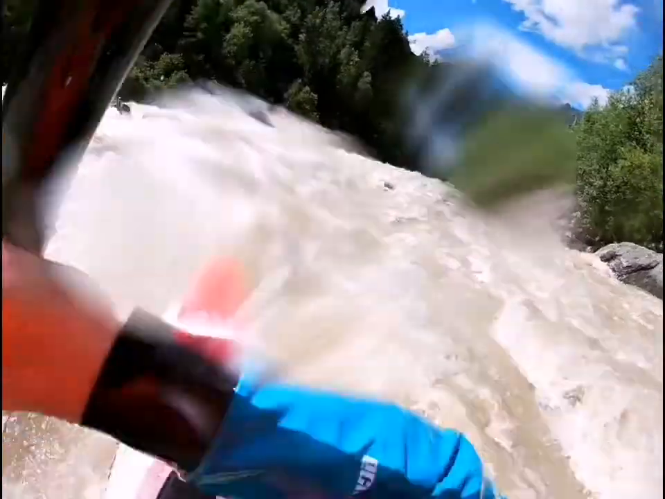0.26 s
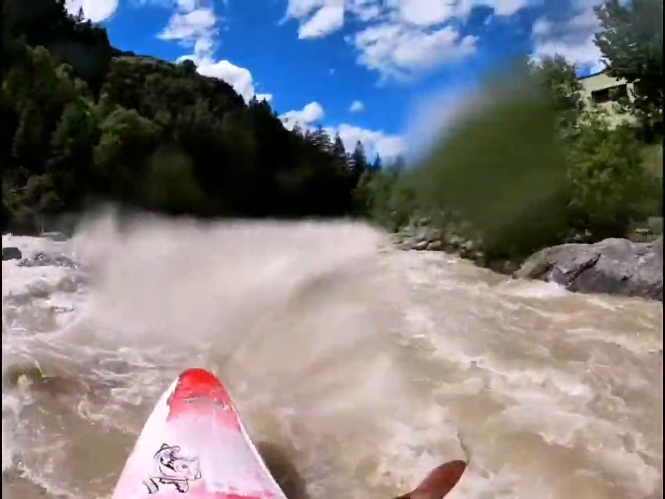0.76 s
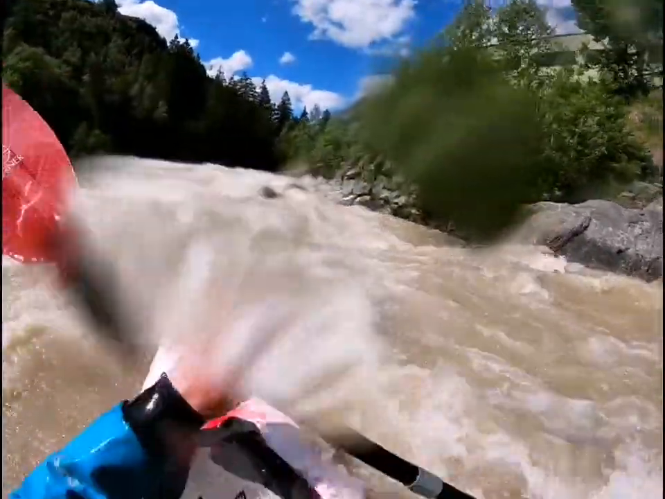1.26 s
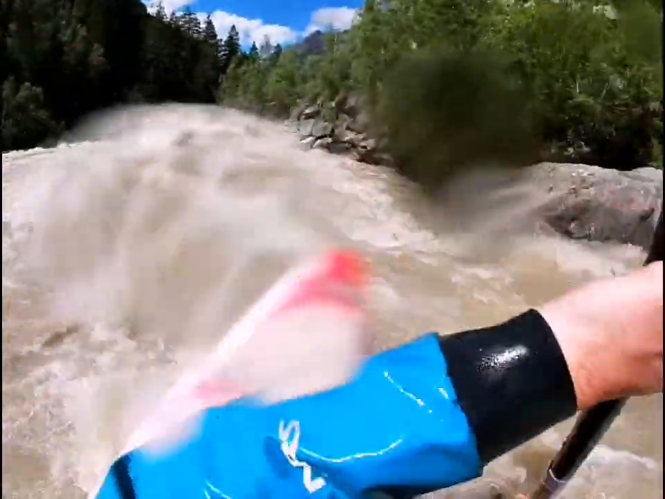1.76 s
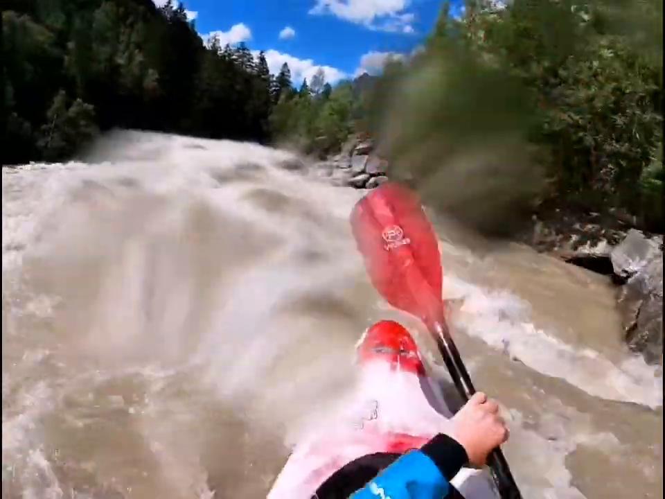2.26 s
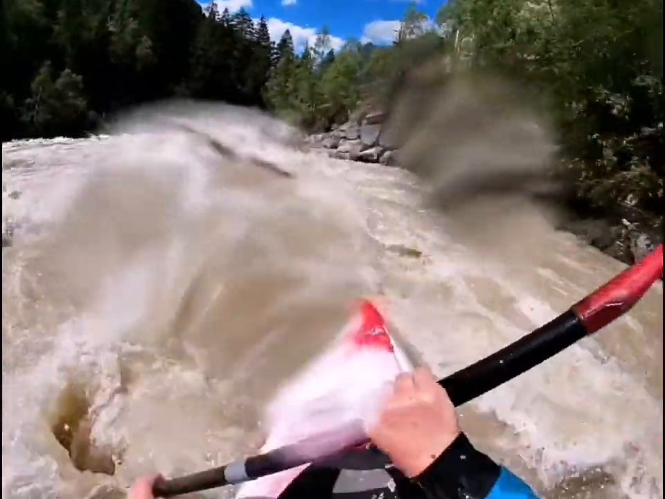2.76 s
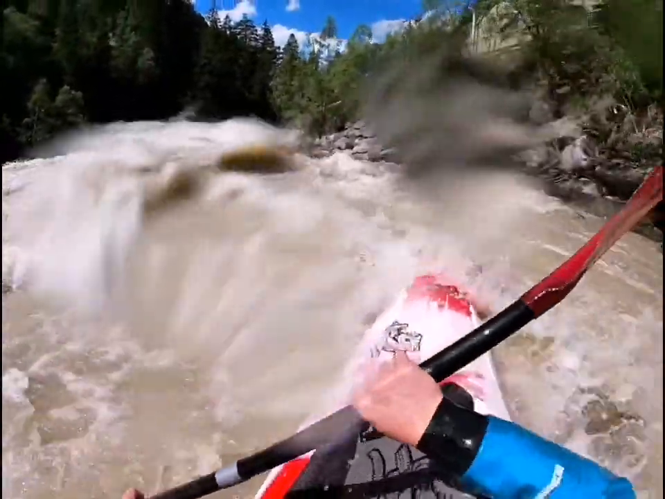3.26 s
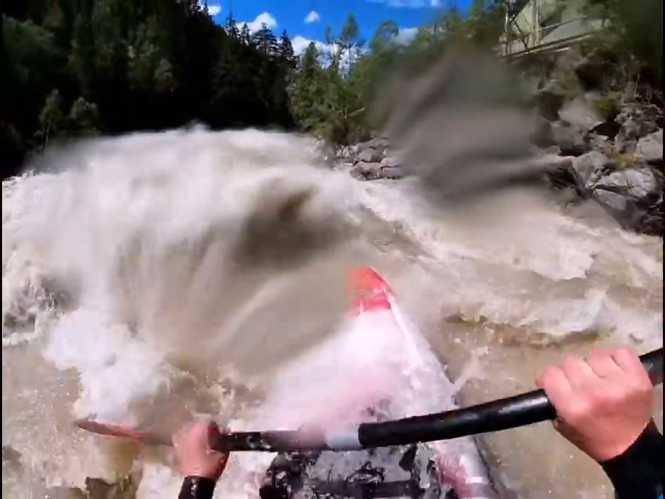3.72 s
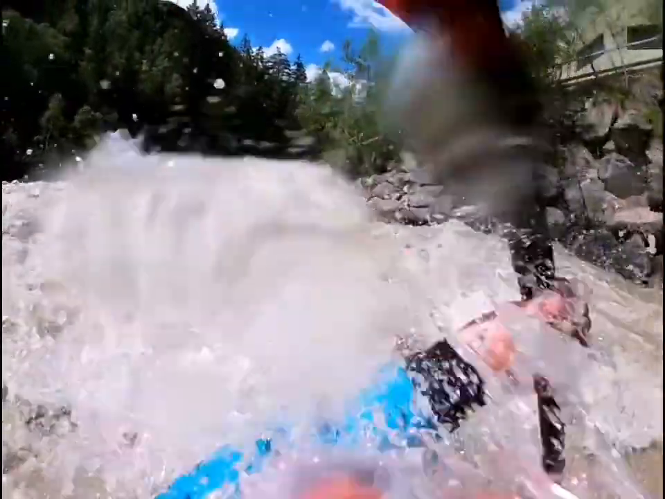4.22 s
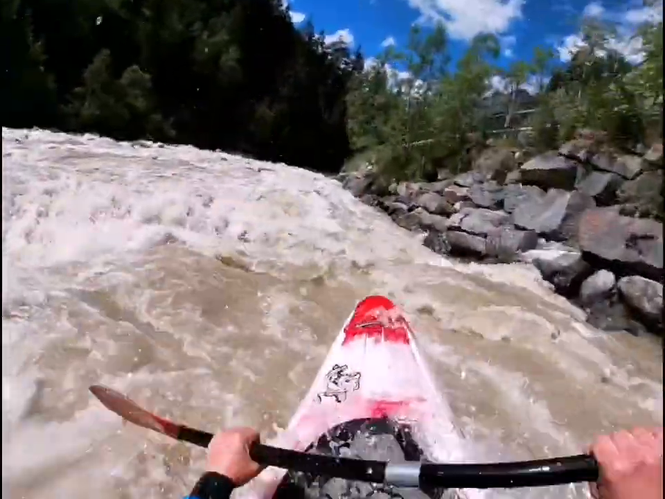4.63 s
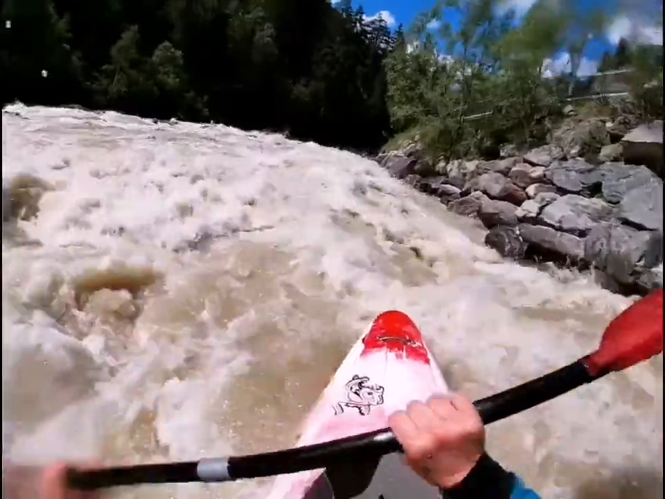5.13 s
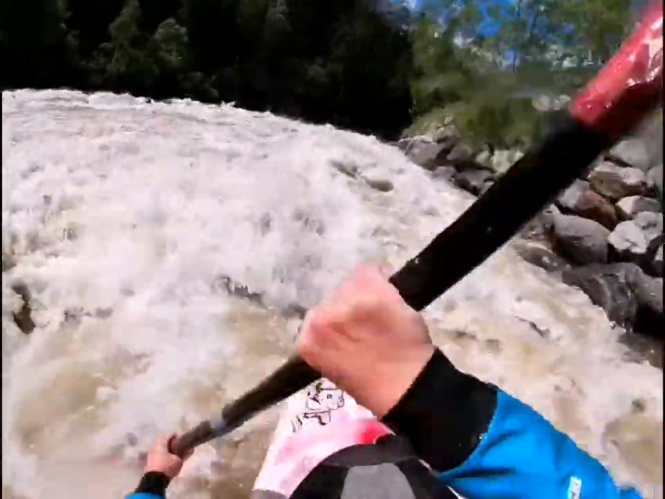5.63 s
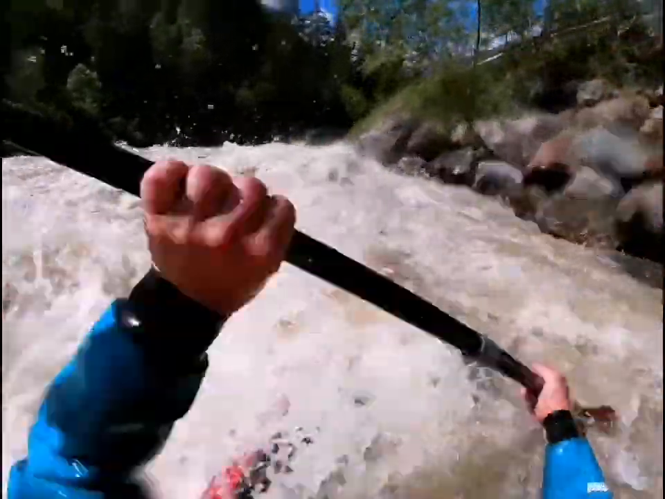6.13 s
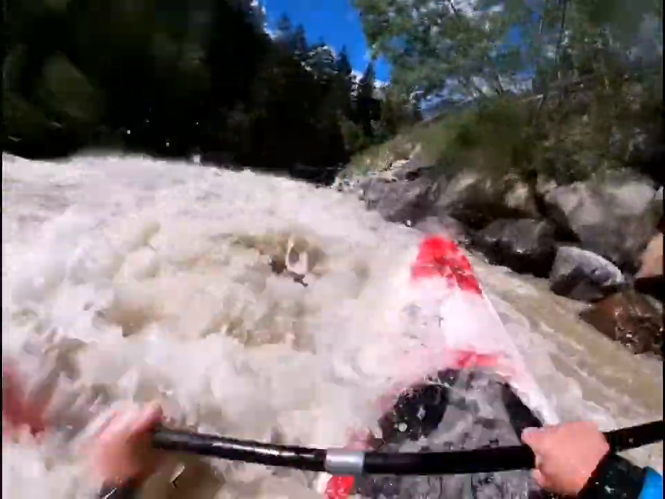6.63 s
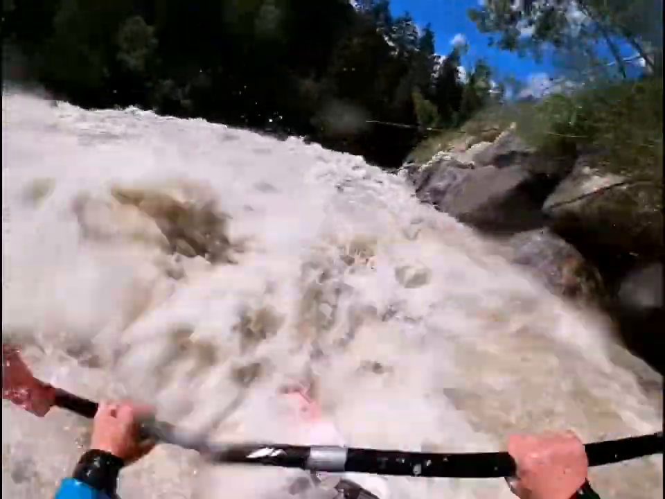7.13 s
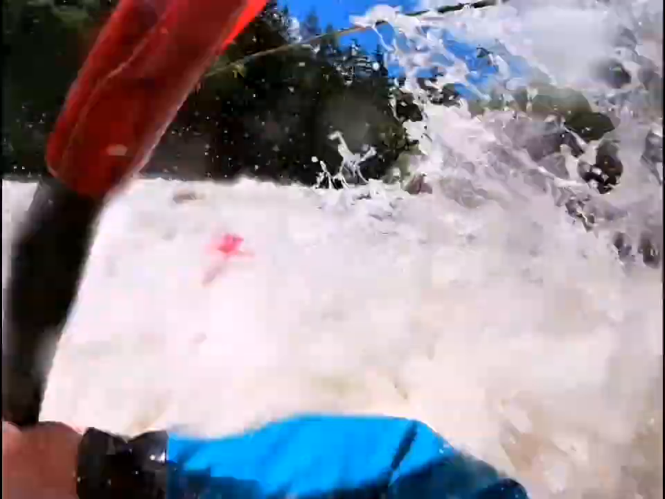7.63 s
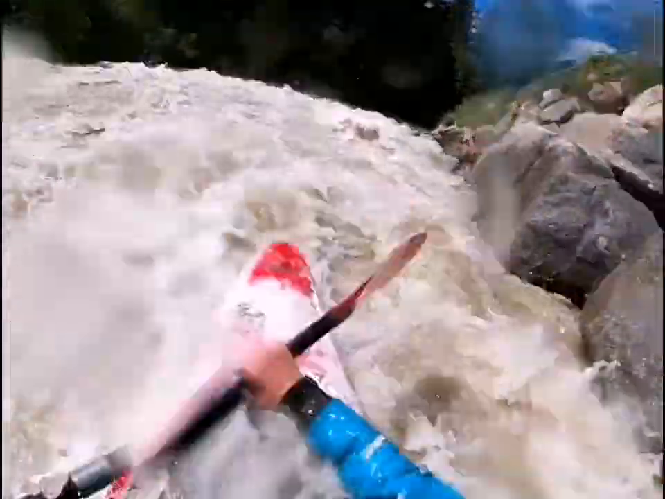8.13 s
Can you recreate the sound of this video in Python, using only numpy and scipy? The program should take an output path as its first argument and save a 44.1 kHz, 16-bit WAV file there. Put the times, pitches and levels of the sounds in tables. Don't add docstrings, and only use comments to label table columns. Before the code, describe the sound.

A big rapid is heard from a kayak through a wet case on the paddler's helmet. From 0 s a continuous, muffled, boxy roar with bubbling fizz surrounds the microphone, while air and water make close, low, fluttering booms. Bubbles plop near 0.15 s; a hull slap, plops and a few drop ticks come around 1.7 s, with more slaps and gurgling from 2.6 to 3.4 s. At about 4.3 s a wave washes over with hard spattering clicks, fine spray and a rushing slosh that grows dull by 4.8 s. The roar dips, then swells near 6 s; sharp drops and deep thumps strike around 6.4 s. Plops and slaps follow at 7 s, a strong surge at 7.4 s, and thuds near 7.8 s. At 8.1 s drops crackle, the water film bursts, and brighter hiss with a faint, quickly fading airy whistle lasts to the end.

```python
import sys
import numpy as np
from scipy import signal
from scipy.fft import rfft, irfft
from scipy.io import wavfile
from scipy.ndimage import uniform_filter1d, minimum_filter1d, map_coordinates

SR = 44100
rng = np.random.default_rng(int(sys.argv[2]) if len(sys.argv) > 2 else 0)


def elevation(decibels):
    levels = np.asarray(decibels, float)
    return 10 ** (levels / 20)


def store_wav(level_fs):
    pcm = np.round(np.clip(np.atleast_2d(level_fs), -1, 1) * 32767)
    wavfile.write(sys.argv[1], SR, pcm.T.astype(np.int16))


N = 369116
T = np.arange(N) / SR

# [t/s, level/dB, clearness/dB]
RIVER = [(0.0, -36, 0), (0.27, -41, -3), (1.0, -38, -3.5), (1.5, -38, 1), (1.75, -39.5, -0.5),
         (2.76, -37, -1), (3.35, -37, -5.5), (4.04, -34.5, 1), (4.45, -31.5, -6), (4.81, -34.5, -13),
         (5.4, -38.5, 1.5), (5.95, -32.5, 2.5), (6.35, -34.5, 2.5), (6.62, -40.5, 2), (6.9, -38.5, -1),
         (7.15, -36, -7), (7.45, -32, 0), (7.7, -35, 2)]
# [t/s, length/s, swell/dB]
SURGES = [(0.925, 0.17, 2.5), (1.197, 0.065, 0), (1.383, 0.03, 3), (1.948, .05, 1), (2.1, 0.057, 2),
          (2.39, 0.11, 0), (3.0, .1, 0.5), (4.75, .1, -1), (5.25, 0.036, 0), (5.797, 0.062, 1.5),
          (6.747, 0.089, -0.5), (7.294, .06, 1), (7.54, 0.045, 1.5), (7.657, 0.056, -2.5),
          (7.95, 0.089, -1.3)]
# [t/s, length/s, change/dB]
CREEPS = [
    (1.36, .05, 1.5),
    (2.6, 0.13, -0.5),
    (5.2, 0.087, 2.5),
    (0.3, 0.34, 1),
    (3.647, 0.38, -2),
    (4.55, 0.38, -0.5),
    (5.7, .3, -0.5),
    (6.6, .3, -1.5),
    (7.605, .3, -1),
]
# [f/Hz, level/dB]
ROAR_COLOUR = [(200, -120), (640, -32), (770, -5.5), (860, -2.5), (980, 1.5), (1300, -4.5), (1620, 0),
               (1850, -7.5), (2200, -19.5), (2600, -53.5), (5000, -120)]
FIZZ_COLOUR = [(600, -120), (1700, -29.5), (2300, -4.5), (2900, -3), (3450, -3.5), (4000, -9),
               (4500, -14.5), (5200, -45.5), (9000, -120)]
SPRAY_COLOUR = [(1500, -120), (3900, -37), (4700, -5.5), (5450, -7.5), (6100, -12), (7000, -16),
                (8500, -23), (12000, -47), (16000, -59.5)]
# [f/Hz, level/dB]
HISS_COLOUR = [(100, -120), (400, -25), (900, -7.5), (2500, -4), (3600, -7), (5800, -15.5), (7000, -39),
               (8200, -40), (10500, -48), (12000, -41), (12800, -46), (13300, -100)]
# [t/s, f/Hz, level/dB]
OPEN_PORT = [
    (8.095, 4430, -63),
    (8.118, 4700, -30),
    (8.128, 4830, -27),
    (8.15, 4980, -32.5),
    (8.185, 4950, -38),
    (8.225, 4800, -36.5),
    (8.275, 4350, -38),
    (8.31, 4600, -38.5),
    (8.345, 4980, -41),
]
# [t/s, peak/dB]
GRILLE_RINGS = [
    (8.125, -52),
    (8.135, -51),
    (8.143, -50),
    (8.154, -54),
    (8.18, -58),
]
# [t/s, wash/dB, film f/Hz]
WAVE = [
    (4.288, -75, 3190),
    (4.3, -33, 3200),
    (4.345, -32, 3300),
    (4.383, -26.5, 3070),
    (4.39, -33, 3840),
    (4.452, -28, 3690),
    (4.461, -29, 2250),
    (4.495, -32.5, 1970),
    (4.84, -36, 1710),
]
# [t/s, length/s, leak/dB]
TEARS = [
    (4.315, 0.021, -15),
    (4.387, 0.0099, -21),
    (4.407, 0.011, -18),
    (4.427, 0.017, -22),
    (4.451, 0.0031, -18.5),
    (4.465, 0.0036, -28),
    (4.48, .004, -32),
]
# [t/s, peak/dB]
PRICKS = [(4.432, -50), (4.448, -50), (4.466, -54), (1.656, -57.5), (2.79, -62), (3.0, -54), (7.798, -53.5),
          (8.204, -50.5), (4.322, -50.5), (4.364, -54), (4.369, -58.5), (4.39, -47), (4.5107, -60),
          (6.357, -50), (6.38, -52.5), (6.41, -41), (6.4176, -56), (6.433, -48), (7.7534, -51),
          (7.8756, -55), (7.9105, -57), (8.0135, -56), (8.034, -52), (8.058, -55), (8.1155, -52.5)]
# [t/s, peak/dB]
SPARKS = [(1.6445, -77), (2.9766, -63), (4.3086, -74), (4.3685, -64), (4.4059, -61.5), (6.356, -82),
          (6.3785, -64.5), (6.4095, -56.5), (6.9293, -69), (7.7348, -77), (7.875, -84), (8.0803, -69),
          (8.1146, -59), (8.1252, -62.5), (4.374, -71.5)]
# [t/s, peak/dB, weight/dB, spot/dB, sharpness/dB]
SPLATTER = [(4.3015, -37, -4, 0, -30), (4.3113, -21, 8, 13.5, -26), (4.3214, -7, -1.5, -0.5, -23),
            (4.337, -42, -5, -2, -4), (4.458, -39, 0, 0, -12), (4.466, -41, 0, 0, -8),
            (4.342, -26, -13, -5, -10), (4.3634, -29, -10, -3, -24), (4.3985, -27, 0, 0, -14),
            (4.4315, -30.5, 2, 2, -10), (4.391, -18, 3.5, 4.5, -16), (4.4072, -38, -3, -5, -18),
            (4.4162, -22.5, -6, 9, -11), (4.4397, -19.5, -10, 5, -24), (4.448, -24, 6, 0, -15),
            (4.5676, -21, -6, -12, -18), (4.6193, -39, 1, -3, -14), (4.632, -42, 0, -2, -20),
            (4.5125, -41, 0, -1, -22), (4.696, -42, 0, 0, -24), (4.7301, -25, -13, 4, -20),
            (8.0343, -26, 9, 12, -17), (8.0465, -33, 13, 12, -17), (8.0576, -45, 5, 6, -13),
            (8.077, -40, 7, 3, -21), (8.0895, -41, -1, -8, -12), (8.0945, -40, -1, -8, -14),
            (8.1045, -24, -6, -9, -16), (8.1152, -10, -3, -1, -15), (8.1263, -13, 2.5, 9.5, -2),
            (8.2322, -25, -4, -5, 4), (8.2485, -25, 10, 3, 2)]
# [t/s, peak/dB, weight/dB, spot/dB, sharpness/dB]
DRIPS = [(1.686, -37.5, 16, 4, -30), (4.482, -30, 0, 0, -24), (4.487, -35, 0, 0, -24),
         (4.499, -40, 0, 0, -24), (6.6015, -34, -2, -2, -21), (6.596, -39, 0, -4, -22),
         (6.63, -46, 0, -3, -22), (7.788, -37, -2, 0, -25), (7.81, -39, 0, 0, -26), (7.939, -37, 5, 4, -18),
         (7.968, -42, 0, 0, -18), (6.512, -42, 0, 0, -22), (6.375, -37, 4, 0, -24), (7.847, -43, 2, 0, -24),
         (6.903, -40, 8, 3, -26), (7.0736, -41, 11, -1, -23), (1.654, -24.5, 16.5, 11.5, -29),
         (2.205, -26.5, -17, -12, -30), (6.4107, -10, -3, -1.5, -26), (6.487, -25.5, -6, 5.5, -27),
         (6.5236, -33, -3, -1, -19), (6.9255, -23, 8, 4, -24), (7.459, -41, 5, 8, -19),
         (7.7338, -48, 5, 6, -12), (7.753, -32, 7, 18.5, -17), (7.7971, -20.5, 0, 13.5, -18),
         (7.9435, -30, 23, 8, -11), (8.0136, -42, 22, 0, -14)]
# [t/s, thud f/Hz, knock f/Hz, body f/Hz, tick f/Hz]
CASE = [(1.655, 870, 1760, 3410, 5300), (4.312, 1000, 1545, 3200, 5400), (4.322, 720, 2400, 3300, 5440),
        (4.342, 800, 2000, 3600, 5100), (4.39, 900, 1500, 3380, 5800), (4.44, 910, 2220, 3420, 5430),
        (4.57, 990, 1750, 3060, 4800), (6.41, 800, 1620, 3130, 5600), (6.926, 1100, 2170, 3000, 4930),
        (7.797, 1000, 1500, 3200, 5200), (7.944, 770, 1630, 3080, 4630), (8.104, 925, 1670, 3680, 6100),
        (8.115, 925, 1400, 3650, 5900), (8.126, 950, 2000, 2650, 4780), (8.232, 895, 1900, 3600, 5100),
        (8.249, 800, 1900, 4300, 5300)]
SWELLS = [0.001, 0.0011, 0.00054, .0005, 0.00022]
# [t/s, peak/dB, f/Hz]
PLOPS = [(0.1412, -16, 650), (0.1899, -24, 1060), (1.7514, -26, 696), (1.8056, -18.5, 730),
         (2.6805, -18.5, 800), (2.741, -26, 650), (2.9794, -21, 800), (2.989, -19, 990), (3.377, -22, 800),
         (3.43, -20, 805), (5.6984, -22, 746), (6.9154, -15.5, 760), (6.9707, -20, 810),
         (7.878, -19.5, 1190), (7.9663, -23, 915)]
# [t/s, level/dB, cavity f/Hz, sharpness q, upper edge f/Hz]
FLOW = [(0.0, -25, 198.6, 1.8, 553), (0.11, -17, 165.7, 1.8, 460), (0.45, -29, 196, 1.2, 518),
        (1.05, -21.5, 283, 2.5, 462), (1.77, -24, 193.5, 1.2, 484), (1.89, -27, 214, 1.2, 529),
        (2.54, -16, 226.3, 3.5, 440), (2.7, -22.5, 188, 1.5, 500), (3.85, -24.5, 203.3, 1.4, 535),
        (4.22, -15.5, 244, 2.1, 458), (4.36, -20, 173, 1.1, 478), (5.3, -23, 199.5, 2.2, 477),
        (5.52, -20, 235.6, 1.1, 479), (6.42, -18.5, 200, 1.6, 455), (6.5, -25, 213, 1.3, 490),
        (7.17, -23.5, 205, 1.4, 496), (7.36, -15.5, 245, 1.9, 454), (8.37, -25.5, 180, 0.99, 486)]
# [t/s, length/s, change/dB]
GUSTS = [(0.81, 0.13, 0), (0.3, .08, -0.5), (1.403, .1, 1), (3.005, 0.11, 2), (5.647, .15, 0),
         (5.903, .12, -2.5), (6.7, .06, -1), (5.123, 0.063, 3), (4.0, 0.078, 0.5), (8.006, 0.063, 0.5),
         (0.173, 0.062, -4), (1.699, .08, 2.5), (1.248, 0.087, 1), (2.281, 0.14, 0), (2.482, .02, 1),
         (2.609, 0.032, -2), (3.249, .08, -3.5), (4.995, 0.081, -3), (6.193, 0.031, 2), (6.949, 0.09, -0.5),
         (7.29, 0.036, 1.5), (7.535, 0.07, -4.5), (7.71, 0.07, -2.5), (7.963, 0.11, -1.5),
         (8.098, .13, 1.5), (8.28, .1, -4.5)]
# [t/s, length/s, level/dB]
JOLTS = [(0.087, 0.056, -23.5), (0.211, 0.13, -22), (0.99, 0.082, -38), (1.24, 0.14, -30.5),
         (1.605, 0.2, -25.5), (2.565, 0.17, -26.5), (2.848, 0.38, -28.5), (3.37, 0.035, -22),
         (3.532, 0.17, -30), (4.103, 0.32, -26.5), (4.502, 0.44, -27.5), (5.496, 0.94, -33),
         (6.267, 0.19, -26), (6.534, 0.072, -27), (6.989, 0.074, -24.5), (7.284, 0.028, -24.5),
         (7.415, 0.16, -22), (7.646, 0.068, -19), (7.756, 0.21, -25), (8.135, 0.11, -28)]
# [t/s, length/s, level/dB]
GURGLES = [(0.0, 0.063, -41), (0.12, 0.077, -36), (1.005, 0.049, -50), (1.58, 0.1, -35), (1.746, 0.16, -44),
           (2.702, 0.094, -31.5), (2.87, 0.041, -36), (2.979, 0.046, -35), (3.075, 0.19, -38.5),
           (3.39, 0.38, -40), (4.363, 0.34, -33), (4.785, 0.22, -37), (5.3, 0.18, -44), (5.56, 0.29, -32.5),
           (5.905, 0.54, -35.5), (6.48, 0.094, -41), (6.66, 0.22, -41.5), (6.92, 0.31, -37.5),
           (7.264, 0.03, -36), (7.5, 0.05, -44), (7.64, 0.07, -37), (7.78, 0.077, -39), (7.967, .4, -37.5)]
# [f/Hz, level/dB]
BUFFET_COLOUR = [(10, -38.5), (25, -1), (40, 12), (70, -3.5), (105, 8.5), (160, 8), (300, -41),
                 (1500, -120)]
FLUTTER_COLOUR = [(100, -120), (380, -25), (560, 1), (700, -3.5), (850, -7.5), (1100, -26.5), (2500, -120)]
# [t/s, peak/dB, f/Hz]
SLAPS = [(1.745, -5, 113), (2.599, -7, 160), (3.322, -6.5, 129), (4.37, -7, 102), (6.016, -4, 159),
         (6.385, -7.5, 51.1), (6.433, -2, 51.1), (6.599, -9, 51.1), (6.983, -6.5, 116), (7.005, -11, 51.1),
         (7.819, -4, 51.1), (7.871, -6, 83.4), (8.204, -14, 70.0)]


def unit(x):
    return x / np.sqrt(np.mean(x ** 2) + 1e-20)


def along(points, hz):
    f, v = np.transpose(points)
    return np.interp(np.log(hz + 1), np.log(f + 1), v)


def steady(points):
    return lambda hz, i: along(points, hz)


def hump(hz, centre_hz, q):
    return -10 * np.log10(1 + (q * (hz / centre_hz - centre_hz / (hz + 1))) ** 2)


def curves(rows):
    s, *cols = np.transpose(rows)
    return [np.interp(T, s, c) for c in cols]


def wobble(rate):
    knots = rng.standard_normal(int(N * rate / SR) + 4)
    return map_coordinates(knots, [np.arange(N) * rate / SR])


def episodes(rows, edge_s, heights):
    total = np.zeros(N)
    for (s, length, _), height in zip(rows, heights):
        inside = np.minimum(T - s + edge_s, s + length + edge_s - T)
        total += height * (inside / edge_s).clip(0, 1)
    return total


def changes(rows, edge_s):
    return episodes(rows, edge_s, [db for *_, db in rows])


def above_rest(rest_db, rows, edge_s):
    return 20 * np.log10(elevation(rest_db) + episodes(rows, edge_s, [elevation(db) for *_, db in rows]))


def water(colour_db, patchy_db, grain_db=-40, per_s=1500):
    clicks = (rng.random(N) < per_s / SR) * rng.laplace(size=N)
    source = rng.standard_normal(N) + elevation(grain_db) * unit(clicks)
    hz, t, z = signal.stft(source, SR, nperseg=1024, noverlap=768)
    gain = elevation(colour_db(hz[:, None], np.minimum((t * SR).astype(int), N - 1)))
    gain = gain / np.sqrt(np.mean(gain ** 2, axis=0))
    patches = uniform_filter1d(rng.standard_normal(z.shape), size=8, axis=0)
    patches = unit(uniform_filter1d(patches, size=12, axis=1))
    z = z * gain * elevation(patchy_db * patches)
    return unit(signal.istft(z, SR, nperseg=1024, noverlap=768)[1][:N])


def add(out, s, sound):
    out[round(s * SR):][:len(sound)] += sound


def blow(t, swell):
    u = t.clip(0) / swell
    return (u * np.exp(1 - u)) ** 3


def resonate(x, strength, centre_hz, q):
    hz = np.fft.rfftfreq(len(x), 1 / SR) + 1
    return irfft(rfft(x) * elevation(strength * hump(hz, centre_hz, q)), len(x))[:N]


def river():
    roar_db, clear_db = curves(RIVER)
    surge_db = changes(SURGES, edge_s=0.037)
    roar_db = roar_db + surge_db
    soaked = ((T - 4.1) / 0.11).clip(0, 1)
    fizz_db = roar_db - 17 + 0.38 * clear_db - 5.5 * soaked + 0.36 * surge_db
    fizz_db = fizz_db + changes(CREEPS, edge_s=.06)
    spray_db = roar_db - 31.5 + clear_db
    tilt_db = .25 * clear_db
    swell = wobble(10)

    def roar_colour(hz, i):
        film = soaked[i] * np.maximum(hump(hz, 1616, q=3.5), -3.0)
        tilt = tilt_db[i] * np.log2((hz + 1) / 1300).clip(-1, 1) * 3
        return along(ROAR_COLOUR, hz) + film + tilt

    def ringing(points, centre_hz, q):
        return lambda hz, i: along(points, hz) + soaked[i] * hump(hz, centre_hz, q)

    roar = water(roar_colour, 1.2, grain_db=-7, per_s=760)
    fizz = water(ringing(FIZZ_COLOUR, 3300, q=1.7), 1.0, grain_db=-5.5, per_s=1100)
    mist = water(ringing(SPRAY_COLOUR, 5400, q=3.0), 1.5, grain_db=-9, per_s=1500)
    roar = elevation(roar_db + 0.49 * swell + 0.16 * wobble(25)) * roar
    fizz = elevation(fizz_db + 0.57 * swell + 0.16 * wobble(23)) * fizz
    return roar + fizz + elevation(spray_db + 0.76 * swell + .6 * wobble(23)) * mist


def open_port():
    port_hz, whistle_db = curves(OPEN_PORT)
    burst_s, shut_db = 8.095, -62.5
    hiss_db = np.interp(T, [burst_s, burst_s + 0.0082], [shut_db, -34])
    bare = hiss_db > shut_db + 1

    def pipe(hz, i):
        q = 12 - 35 * (i / SR - OPEN_PORT[3][0]).clip(0, .15)
        whistle = 1.7 * hump(hz, port_hz[i], q)
        overtone = 1.5 * hump(hz, 7400, q=25) - 13 - 300 * abs(i / SR - OPEN_PORT[2][0])
        return np.maximum(whistle, overtone) - 40 * (hz > 12900)

    hiss = elevation(hiss_db + 1.2 * wobble(47)) * water(steady(HISS_COLOUR), 0.57, grain_db=-8.5, per_s=620)
    whistle = elevation(whistle_db + 1.6 * wobble(63)) * water(pipe, 1.1, grain_db=-5.5, per_s=300)
    return bare * (hiss + whistle)


def wave():
    wash_db, film_hz = curves(WAVE)
    tear_edge_s = 0.0062
    sealing_db = -25 - 52 * (T - 4.1).clip(0)[:N].clip(0, 1)
    leak_db = above_rest(sealing_db, TEARS, tear_edge_s)
    pocket_db = 15 * ((4.395 - T) / tear_edge_s).clip(0, 1)

    def film(hz, i):
        passed = np.maximum(hump(hz, film_hz[i], q=2.1), -1.5 - .2 * pocket_db[i])
        bass_loss = hump(np.minimum(hz, 700), 700, q=0.98)
        notch = pocket_db[i] * elevation(4.4 * hump(hz, 2450, q=5.5))
        leak = leak_db[i] - 7.9 * (hz / 1000 - 5.5).clip(0)
        above = np.maximum(3.5 * hump(hz, film_hz[i], q=11.0), leak)
        return np.where(hz < film_hz[i], passed + bass_loss - notch, above)

    arrived = wash_db > WAVE[0][1] + 1
    draining = ((WAVE[-1][0] - T) / 0.043).clip(0, 1)
    level = elevation(wash_db + 0.68 * wobble(60)) * arrived * draining
    return level * water(film, 2.3, grain_db=-12, per_s=920)


def pricks(rows, length_s, centre_hz, q):
    out, t = np.zeros(N + SR), np.arange(SR // 60) / SR
    for s, db in rows:
        noise = rng.standard_normal(len(t))
        add(out, s, elevation(db) * noise * t / length_s * np.exp(1 - t / length_s))
    return resonate(out, 2.3, centre_hz, q)


def fine_spray():
    spray = pricks(PRICKS, .0008, 6200, q=0.98)
    mist = elevation(-6.5) * pricks(SPARKS, .002, 12500, q=2.2)
    return spray + mist + pricks(GRILLE_RINGS, .003, 11900, q=9)


def splats():
    out, t = np.zeros(N + SR), np.arange(SR // 30) / SR
    for s, db, *_ in SPLATTER + DRIPS:
        add(out, s, elevation(db - 16.5 - 60 * t / 0.027) * rng.laplace(size=len(t)))
    return resonate(out, 4.5, 3300, q=1.0)


def drops():
    out, lead = np.zeros(N + SR), SR // 500
    t = (np.arange(SR // 60) - lead) / SR - .0013
    when, *case_hz = np.transpose(CASE)
    for s, db, thud_db, knock_db, tick_db in SPLATTER + DRIPS:
        sparkle_db = -37 + .3 * tick_db
        levels = (thud_db - 0.5, knock_db - 3.5, -1.2, tick_db + 4.5, sparkle_db + 6)
        pitches = [np.interp(s, when, hz) for hz in case_hz] + [8300]
        for level, hz, swell in zip(levels, pitches, SWELLS):
            detune, turn = .015 * rng.standard_normal(), rng.standard_normal()
            ring = np.cos(2 * np.pi * hz * (1 + detune) * t + turn)
            add(out, s - lead / SR, elevation(db + level - 0.24) * blow(t + swell, swell) * ring)
    return out[:N]


def plops():
    out, t = np.zeros(N + SR), np.arange(SR // 50) / SR
    swell_s = 0.0018
    for s, db, hz in PLOPS:
        sag = 1 + .15 * (1 - t / swell_s / 2)
        add(out, s, elevation(db) * blow(t, swell_s) * np.sin(2 * np.pi * hz * t * sag))
    return out[:N]


def slaps():
    out, t = np.zeros(N + SR), np.arange(SR // 12) / SR
    for s, db, hz in SLAPS:
        u = t * hz * 4.7
        add(out, s, elevation(db - 2.5) * (u * np.exp(1 - u)) ** 2 * np.sin(2 * np.pi * hz * t))
    return out[:N]


def rush():
    boom_db, centre_hz, sharp, edge_hz = curves(FLOW)
    boom_db = boom_db + changes(GUSTS, edge_s=0.031)
    shaking_db = -28.5 + 0.12 * (boom_db - boom_db.mean())
    buffet_db = above_rest(shaking_db, JOLTS, edge_s=.05)
    flutter_db = above_rest(-53.5, GURGLES, edge_s=0.056)
    eddies = wobble(16)

    def cavity(hz, i):
        shut_off = 3.3 * hump(np.maximum(hz, edge_hz[i]), edge_hz[i], q=2.37)
        return hump(hz, centre_hz[i], sharp[i]) + shut_off

    buffet = elevation(buffet_db + 0.44 * eddies) * water(steady(BUFFET_COLOUR), patchy_db=1.0)
    boom = elevation(boom_db + 1.2 * eddies + 0.2 * wobble(30)) * water(cavity, patchy_db=0.5)
    flutter = water(steady(FLUTTER_COLOUR), 0.98, grain_db=-2.5, per_s=150)
    return buffet + boom + elevation(flutter_db + 0.41 * eddies + 1.2 * wobble(25)) * flutter


def scene():
    around = river() + open_port() + wave()
    on_case = fine_spray() + splats() + drops() + plops()
    return (around + on_case + slaps() + rush())[None]


def band_limit(x):
    return signal.sosfilt(signal.butter(12, 15500, fs=SR, output="sos"), x)


def record(dry):
    ceiling, hold = .66, round(.012 * SR)
    gain = minimum_filter1d(ceiling / np.maximum(np.abs(dry), ceiling), size=2 * hold)
    mix = dry * uniform_filter1d(gain, size=hold)
    return band_limit(mix)


dry = scene()
out = record(dry)
store_wav(out)
```